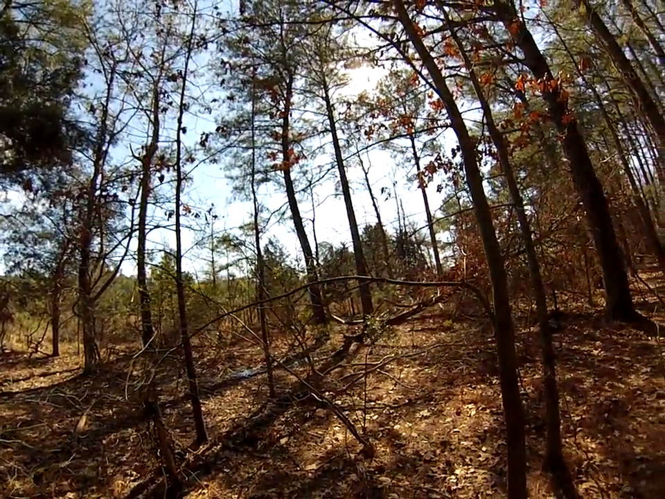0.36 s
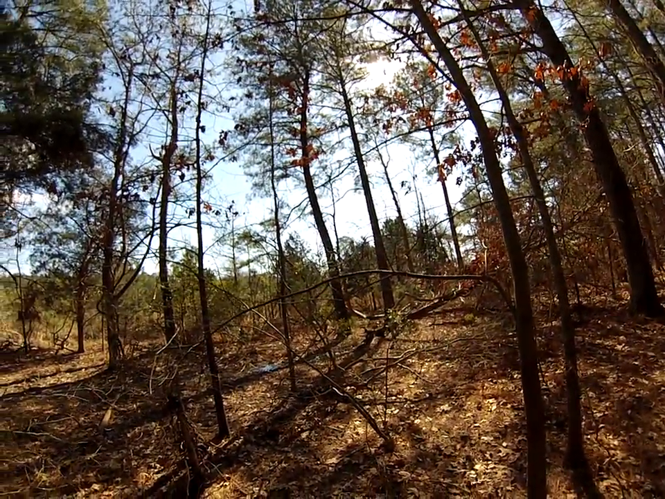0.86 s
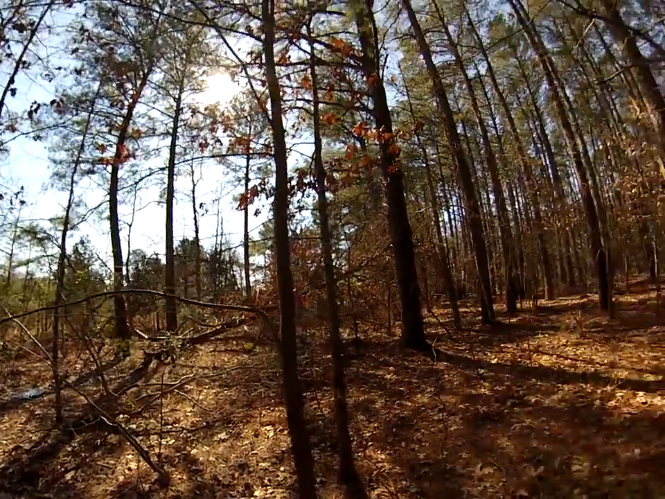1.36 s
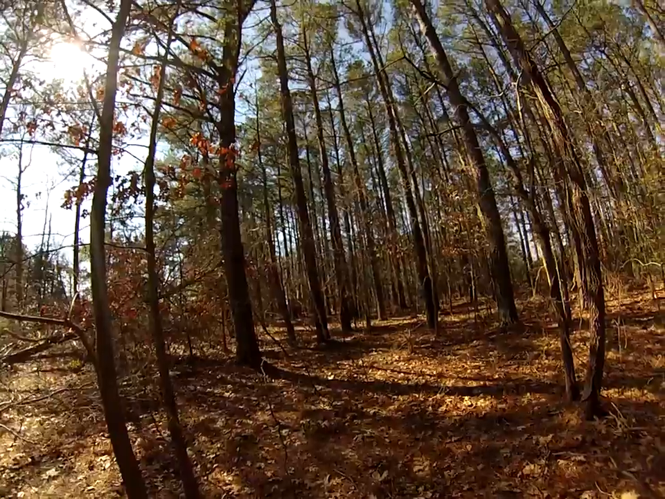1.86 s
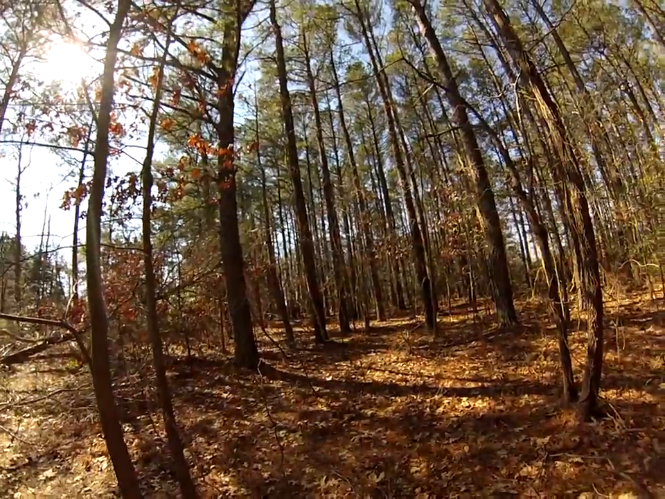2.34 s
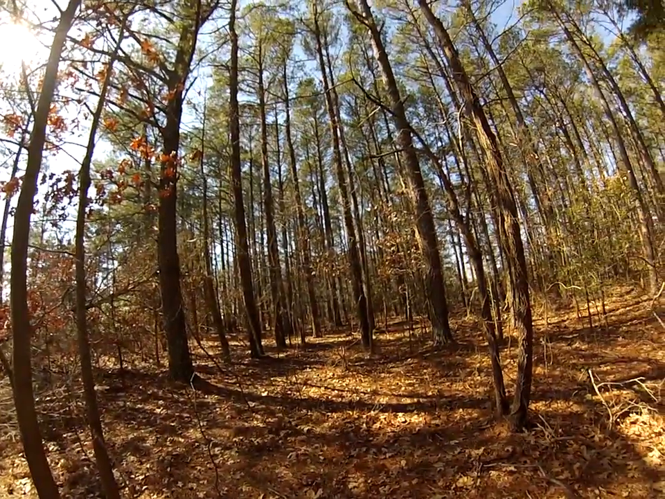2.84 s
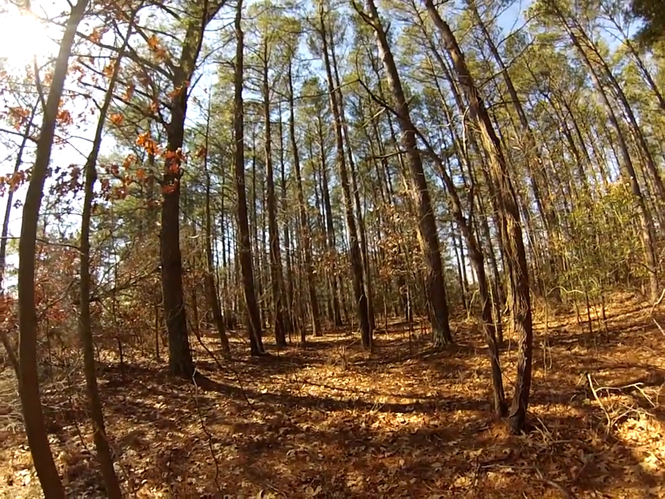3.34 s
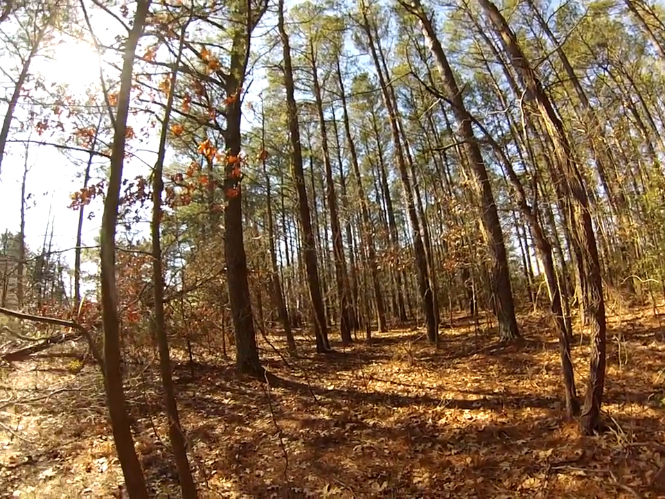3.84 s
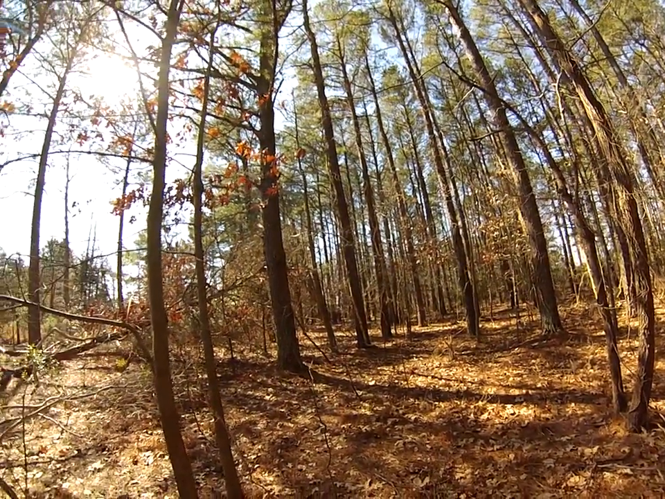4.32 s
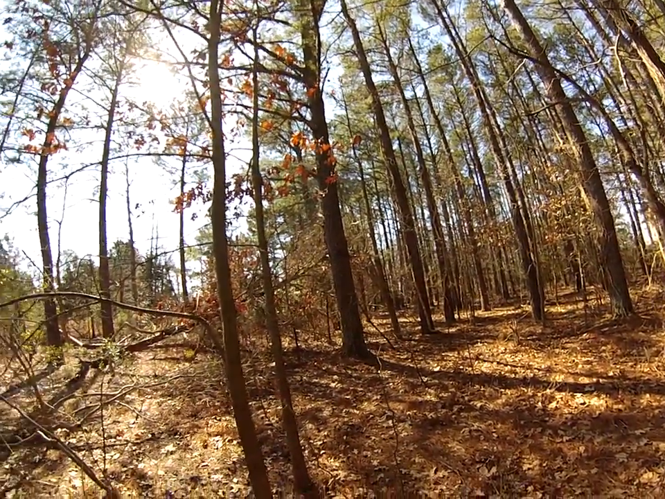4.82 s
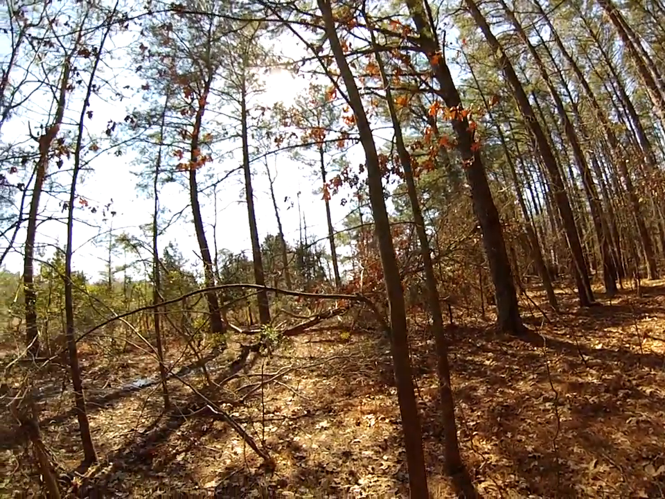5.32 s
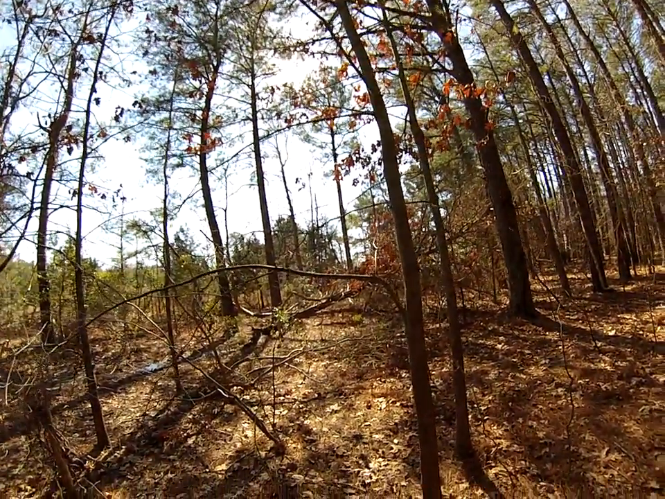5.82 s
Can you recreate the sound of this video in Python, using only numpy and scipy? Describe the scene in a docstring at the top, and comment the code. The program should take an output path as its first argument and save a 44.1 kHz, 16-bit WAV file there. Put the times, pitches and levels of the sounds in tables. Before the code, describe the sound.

A distant pack of dogs gives tongue among pine trunks, hoarse bays and bright yelps trailing echoes, with tiny bird notes above.

```python
"""Hounds in pine woods

Hounds give tongue far off in open pine woods; the trunks scatter every cry into a long tail.
Each voice is a sum of unsteady partials with breath: one bays hoarsely on two tones at once, one yelps
bright, one mellow, one howls high. Shaped noise makes the light breeze on the microphone, the dry leaves
and the steady hiss; sine tones make a small bird's notes and the thin whine of the electronics."""
import sys
import numpy as np
from scipy import signal
from scipy.fft import rfft, irfft, next_fast_len
from scipy.io import wavfile
from scipy.ndimage import uniform_filter1d, map_coordinates

SR = 44100
rng = np.random.default_rng(int(sys.argv[2]) if len(sys.argv) > 2 else 0)


def output_pcm(signal):
    """Save a mono or channel-first signal as 16-bit PCM at the path in sys.argv[1].

    Samples are clipped to [-1, 1] before scaling.
    """
    pcm = np.clip(np.atleast_2d(signal).T, -1, 1) * 32767
    wavfile.write(sys.argv[1], SR, np.round(pcm).astype(np.int16))


def boost_factor(decibels):
    """Convert a level in decibels to a linear amplitude factor."""
    exponent = np.asarray(decibels, float) / 20
    return 10 ** exponent


N = 261954
T = np.arange(N) / SR  # seconds

# Hoarse bays. Each row: start in seconds, length to the last push in seconds, level in dB, last push in dB,
# rise of the opening overtones in dB, second tone in dB.
BAY_CALLS = [(.26, .16, -40.5, 3, 3.5, -32), (.89, 0.14, -36, 3, -7, -32),
             (1.487, 0.16, -41.5, 8.5, 7, -33.5), (2.56, .16, -37, 3, -4, -31),
             (3.251, .16, -41.5, 8, 2, -34), (4.693, 0.15, -42.5, 4, 6.5, -32.5)]
# Course of every bay. Each row: share of the length (0-1), added time in seconds, pitch ratio, level in dB,
# overtones in dB, second tone's pitch ratio, second tone's level in dB.
BAY_COURSE = [(0, 0, .74, -22, 0, .99, -48), (0, .013, .85, -7, 0, .99, -39),
              (0, .036, .97, -1, -6, .97, -9), (.5, 0, .99, 0, -16, .995, -1),
              (.75, 0, 1.005, 0, -16, 1.01, 0), (1, 0, 1.05, 0, -14, 1, -9),
              (1, .017, .87, -11, -22, .99, -35), (1, .032, .64, -20, -22, .99, -44),
              (1, .051, .4, -31, -22, .99, -48)]
# Bright yelps. Each row: start in seconds, length in seconds, top pitch in Hz, depth of the pitch arch as a
# factor, sag over the call in Hz, level in dB, overtones in dB, open mouth on partials 3 and up in dB.
YELP_CALLS = [(-.12, 0.26, 512.7, 0, 3, -59.5, -6, -15), (0.179, 0.19, 561.5, 0.13, 37.4, -33.5, -10, 4),
              (1.08, .19, 515.5, .6, 2.7, -44, 0.5, -5.5),
              (2.065, 0.23, 519.8, 1.01, 4.2, -36.5, -6.5, 0.5),
              (2.55, .22, 509.3, 1.13, 2.9, -36, -10.5, 4.5),
              (5.575, 0.25, 546.7, 1.01, 3.6, -33.5, -7, 1.5)]
# Course of every yelp. Each row: share of the length (0-1), added time in seconds, pitch below the top as a
# fraction, level in dB, overtones in dB.
YELP_COURSE = [(0, 0, .2, -19, 4), (0, .012, .17, -11, 3), (0, .036, .055, -4, 3), (.29, 0, 0, -1, -1),
               (.58, 0, .008, 0, 0), (.78, 0, .06, -4, 4), (1, -.02, .14, -11, 4), (1, 0, .17, -32, 6)]
# Mellow yelps. Each row: start in seconds, length to the steep drop in seconds, top pitch in Hz, level in dB,
# overtones in dB.
MELLOW_CALLS = [(4.691, .188, 520.8, -29, -22.5), (5.135, .145, 507.2, -29.5, -27)]
# Course of every mellow yelp. Each row: share of the length (0-1), added time in seconds, pitch ratio,
# level in dB, overtones in dB.
MELLOW_COURSE = [(0, 0, .68, -32, 21), (0, .014, .77, -21, 20), (.22, 0, .85, -15, 13),
                 (.45, 0, .95, -5, 5), (.77, 0, 1, 0, 0), (1, 0, .94, -7, 0), (1, .02, .65, -24, -3),
                 (1, .045, .37, -38, -3)]
# High howls. Each row: start in seconds, length in seconds, pitch in Hz, sag in Hz/s, level in dB, fade in dB/s.
HOWL_CALLS = [(.15, 0.071, 706, 100, -35.5, 61), (0.215, 0.051, 713, 60, -41, 32),
              (.31, 0.147, 672, 370, -34, -20), (0.462, 0.425, 653, 60, -32.5, 25.5),
              (1.229, 0.067, 610, 200, -40.5, 142), (5.568, .045, 655, 3, -47, 30)]

# Combination tones from the larynx. Each row: multiple of the first tone, multiple of the second.
COMBINATIONS = [(2, -1), (-1, 2), (3, -1), (1, 1), (0, 2), (4, -1), (2, 1), (1, 2)]
# Their levels, in the same order: dB relative to the second tone.
COMBINATION_DB = [-26, -15, -16, -13, -19, -25, -33, -38]
# Resonance of throat and mouth. Each row: frequency in Hz, gain in dB over the overtone level.
BAY_RESONANCE = [(600, 0), (900, 0), (1250, -9), (1500, -21), (1750, -38), (2600, -46)]
YELP_RESONANCE = [(800, -1), (1050, 1), (1300, -5), (1600, -11), (1800, -28), (2150, -20), (2400, -29),
                  (2750, -33)]
MELLOW_RESONANCE = [(700, 0), (1000, 0), (1350, -5), (1650, -30), (2050, -26), (2600, -30)]
HOWL_RESONANCE = [(1200, -2), (1400, -4), (1900, -17), (2600, -32), (3300, -40)]
# Colour of the hoarse breath. Each row: frequency in Hz, relative density in dB per Hz.
BREATH_COLOUR = [(220, -36), (330, -12), (600, 0), (950, -5), (1300, -16), (1600, -30), (2000, -42),
                 (4000, -70)]
# Decay of the woods. Each row: frequency in Hz, time to fall 60 dB in seconds.
WOODS_DECAY = [(300, .9), (600, 1.25), (1100, 1.0), (1600, .65), (2100, .5), (6000, .3)]
# Strength of the echoes; thin trunks return little bass. Each row: frequency in Hz, echo in dB.
TRUNK_ECHO = [(200, -26), (330, -14), (450, -7), (1500, -5), (2200, -1), (4000, -4)]

# Buffets of the breeze. Each row: time in seconds, level in dB.
BUFFETS = [(0.0, -44), (0.05, -52.5), (0.84, -46), (0.88, -53.5), (1.47, -46.5), (1.72, -56), (1.8, -48),
           (2.55, -51.5), (2.74, -35.5), (3.09, -50.5), (5.87, -50), (5.94, -46)]
# Colour of the breeze. Each row: frequency in Hz, relative density in dB per Hz.
BREEZE_COLOUR = [(11, -33), (18, 3), (32, 2), (75, -6), (156, -31.5), (178, -36), (250, -25.5), (320, -59),
                 (550, -120)]
# Stirs in the leaves. Each row: peak in seconds, rise in seconds, fall in seconds, level in dB.
LEAF_STIRS = [(.23, 0.023, 0.062, -68), (1.01, 0.047, 0.03, -77), (1.19, 0.16, .06, -70.5),
              (2.131, 0.02, 0.087, -80.5), (2.68, .05, 0.099, -79), (5.05, 0.16, .06, -81),
              (5.295, 0.0049, 0.035, -68.5), (5.86, 0.067, 0.43, -59)]
# Colour of the leaves. Each row: frequency in Hz, relative density in dB per Hz.
LEAF_COLOUR = [(1470, -12.5), (2500, -1), (2880, -3), (5970, -7.5), (12000, -22.5), (12700, -12),
               (15000, -24.5)]
# Clear bird notes. Each row: start in seconds, length in seconds.
CLEAR_NOTES = [(0, .03), (.295, .055), (.645, .04), (2.15, .04), (2.295, .05), (2.48, .045), (2.83, .05),
               (3.035, .04), (3.3, .055), (3.65, .045), (3.85, .045), (4.13, .055)]
# Hoarse bird notes: starts in seconds.
HOARSE_NOTES = [.9, 1.14, 1.36, 1.61, 1.96, 4.97]
# Colour of far woods and microphone hiss. Each row: frequency in Hz, relative density in dB per Hz.
AIR_COLOUR = [(60, -16), (100, 3), (230, -7.5), (500, -5), (870, -10), (1660, -20.5), (4270, -25),
              (8000, -28.5), (12000, -28), (13500, -30), (15200, -33)]
# Tones of the whine. Each row: frequency in Hz, level in dB rms within a burst.
WHINE_TONES = [(4160, -87), (5280, -94), (7780, -94), (8316, -75), (8882, -84), (10560, -94), (11910, -87),
               (12472, -75), (13034, -81), (13588, -91)]


def hounds():
    """Superposition: each hound stands elsewhere, so each voice has its own set of echoes."""
    bay = voice(list(bays()), BAY_RESONANCE, jitter=0.018, shimmer_db=2.5, breath_db=-38.0)
    mouths = [row[-1] for row in YELP_CALLS]
    yelp = voice(list(yelps()), YELP_RESONANCE, jitter=0.012, shimmer_db=2.62, breath_db=-28.5, mouths=mouths)
    mellow = voice(list(mellows()), MELLOW_RESONANCE, jitter=0.0136, shimmer_db=3.1, breath_db=-23.5)
    howl = voice(list(howls()), HOWL_RESONANCE, jitter=0.014, shimmer_db=2.2, breath_db=-20, side=(102, -15))
    throb_hz, throb_db = 26, 4
    howl = howl * boost_factor(throb_db * np.sin(2 * np.pi * throb_hz * T + 3 * wobble(9)))
    return sum(cry + woods(cry, rise=0.057) for cry in (bay, yelp, mellow, howl))


def bays():
    """Biphonation: a scoop up, a hold with a second tone, a last push, then the pitch collapses."""
    first_hz, second_hz = 429.1, 526.5
    for start, length, db, push_db, open_db, second_db in BAY_CALLS:
        s, share, ratio, level, over, ratio2, level2 = stretch(BAY_COURSE, start, length)
        level = db + level + push_db * (share == 1)
        over = over + open_db * (share == 0)
        yield np.c_[s, first_hz * ratio, level, over, second_hz * ratio2, second_db + level2]


def yelps():
    """Coupling of pitch and loudness: both arch together."""
    tire_db_per_hz = 0.22  # a sagging yelp also weakens
    for start, length, top_hz, arch, sag_hz, db, over_db, _ in YELP_CALLS:
        s, share, under, level, over = stretch(YELP_COURSE, start, length)
        hz = top_hz * (1 - arch * under) - sag_hz * share
        level = db + level - tire_db_per_hz * sag_hz * share
        yield np.c_[s, hz, level, over_db + over]


def mellows():
    """Falling overtone content: a slow climb darkens as it swells, then drops steeply."""
    for start, length, top_hz, db, over_db in MELLOW_CALLS:
        s, _, ratio, level, over = stretch(MELLOW_COURSE, start, length)
        yield np.c_[s, top_hz * ratio, db + level, over_db + over]


def howls():
    """Breath pressure: after a quick scoop, pitch and level sag as the breath runs out."""
    rise_s, fall_s = 0.03, 0.019
    scoop, edge_db, over_db = 0.057, -15, -23  # scoop: fraction of the pitch
    for start, length, top_hz, sag, db, fade in HOWL_CALLS:
        age = np.array([0, rise_s, max(length - fall_s, rise_s), length])
        held = np.clip(age - rise_s, 0, None)
        edge = (age == 0) | (age == length)
        hz = (top_hz - sag * held) * (1 - scoop * (age == 0))
        level = db - fade * held + edge_db * edge
        yield np.c_[start + age, hz, level, over_db + 0 * age]


def stretch(course, start, length):
    """Time scaling: the moments of a course fitted to one call, its shares, then its other columns."""
    share, plus, *cols = np.transpose(course)
    return start + share * length + plus, share, *cols


def voice(calls, throat, jitter, shimmer_db, breath_db, mouths=None, side=None):
    """Harmonic series on an unsteady pitch, with breath; a second tone, if any, adds combination tones."""
    out, breath = np.zeros(N), noise(BREATH_COLOUR)
    for rows, mouth_db in zip(calls, mouths or np.zeros(len(calls))):
        s, *cols = np.transpose(rows)
        on = (T >= s[0]) & (T < s[-1])
        n = on.sum()
        curves = [uniform_filter1d(np.interp(T[on], s, c), size=400) for c in cols]
        hz, db, over_db, *second = curves

        def turn(pitch):
            """Phase as the running integral of a jittered frequency."""
            return 2 * np.pi * np.cumsum(pitch * (1 + jitter * wobble(160, size=n))) / SR

        def shake():
            """Shimmer: a random level change in dB."""
            return shimmer_db * wobble(70, size=n)

        phase = turn(hz)
        cry = boost_factor(db + shake()) * np.sin(phase)
        cry += boost_factor(db + breath_db) * breath[on]
        for k in range(2, 6):  # higher partials flicker more
            partial_db = db + over_db + along(throat, k * hz) + mouth_db * (k > 2) + k / 2 * shake()
            cry += boost_factor(partial_db) * np.sin(k * phase + k)
        if second:
            second_hz, second_db = second
            other = turn(second_hz)
            cry += boost_factor(second_db + shake()) * np.sin(other)
            cry += boost_factor(second_db - 17) * breath[on]
            for (a, b), mix_db in zip(COMBINATIONS, COMBINATION_DB):
                cry += boost_factor(second_db + mix_db + 2 * shake()) * np.sin(a * phase + b * other)
        if side:  # a flutter of the folds puts a side tone above the pitch
            side_hz, side_db = side
            cry += boost_factor(db + side_db + 2 * shake()) * np.sin(phase + 2 * np.pi * side_hz * T[on])
        out[on] += np.sqrt(2) * cry * signal.windows.tukey(n, 0.04)
    return out


def woods(x, rise):
    """Multiple scattering: trunks near and far answer, so the tail swells, then decays band by band."""
    hz, t, z = signal.stft(rng.standard_normal(2 * SR), SR, nperseg=256)
    swell_s = rise * 500 / (hz[:, None] + 200)  # twigs nearby scatter the treble at once
    shape = 1 - np.exp(-t / swell_s)
    shape *= boost_factor(-60 * t / along(WOODS_DECAY, hz)[:, None])
    shape *= boost_factor(along(TRUNK_ECHO, hz))[:, None] / np.linalg.norm(shape, axis=1, keepdims=True)
    tail = signal.istft(z * shape, SR, nperseg=256)[1]
    return signal.fftconvolve(x, tail / np.sqrt(128))[:N]  # 128 samples a frame


def breeze():
    """Wind pressure: lumpy low-frequency swings at the microphone, rising and falling in buffets."""
    lumps = unit(boost_factor(0.84 * wobble(10)) * noise(BREEZE_COLOUR))
    return boost_factor(np.interp(T, *np.transpose(BUFFETS))) * lumps


def leaves():
    """Granular noise: dry leaves crackle in clumps, faintly all along and louder at each stir."""
    grains = boost_factor(1.5 * wobble(30) + 2.5 * wobble(400))
    level = boost_factor(-77)  # the faint, constant crackle
    for peak, rise, fall, db in LEAF_STIRS:
        level = level + boost_factor(db) * np.exp(-np.abs(T - peak) / np.where(T < peak, rise, fall))
    return level * unit(grains * noise(LEAF_COLOUR))


def bird():
    """Frequency modulation: clear notes have a strong octave; hoarse ones smear in pitch and weaken it."""
    out = np.zeros(N)
    # start s, length s, pitch Hz, level dB, pitch smear Hz
    notes = [(s, length, 5640, -71.5, 8) for s, length in CLEAR_NOTES]
    notes += [(s, 0.14, 5740, -72.5, 200) for s in HOARSE_NOTES]
    for s, length, hz, db, smear_hz in notes:
        on = (T >= s) & (T < s + length)
        n = on.sum()
        phase = 2 * np.pi * np.cumsum(hz + smear_hz * wobble(588, size=n)) / SR
        octave = boost_factor(-3 - smear_hz / 20) * np.sin(2 * phase)
        out[on] += boost_factor(db) * (np.sin(phase) + octave) * signal.windows.tukey(n, 0.4)
    return out


def air():
    """Stationary noise: far woods and microphone hiss, drifting slightly in level."""
    return boost_factor(-58.0 + 0.19 * wobble(2.72)) * noise(AIR_COLOUR)


def whine():
    """Periodic gating: the electronics leak thin tones in 48 bursts a second, with short gaps between."""
    since = (T + 0.0011) % (1 / 48)  # seconds into the burst; each restarts the tones
    tones = np.zeros(N)
    for hz, db in WHINE_TONES:
        tones += np.sqrt(2) * boost_factor(db) * np.sin(2 * np.pi * (hz * since + rng.random()))
    gate = (since < 0.0181) * 1.0
    return tones * uniform_filter1d(gate, size=20)


def noise(spectrum):
    """Spectral shaping: Gaussian noise of rms 1 with the given colour."""
    m = next_fast_len(N)
    gain = boost_factor(along(spectrum, np.fft.rfftfreq(m, 1 / SR)))
    return unit(irfft(rfft(rng.standard_normal(m)) * gain, m)[:N])


def wobble(rate, size=N):
    """Band-limited fluctuation: a smooth random curve with rate knots a second."""
    knots = rng.standard_normal(int(size * rate / SR) + 4)
    return map_coordinates(knots, [np.arange(size) * rate / SR])


def along(points, hz):
    """Logarithmic frequency scale: (Hz, value) points interpolated on it."""
    f, v = np.transpose(points)
    return np.interp(np.log(hz + 1), np.log(f + 1), v)


def unit(x):
    """Power normalisation: scaled to rms 1."""
    return x / np.sqrt(np.mean(x ** 2) + 1e-20)


def scene():
    """Superposition: all the sound sources and the hiss sum at the one microphone."""
    return (hounds() + breeze() + leaves() + bird() + air())[None]


def top_cut(x):
    """Nothing passes above the cut-off."""
    return signal.sosfilt(signal.butter(12, 15190, fs=SR, output="sos"), x)


def record(dry):
    """Electrical interference: the whine of the electronics adds to the microphone signal."""
    mix = dry + whine()
    return top_cut(mix)


dry = scene()
out = record(dry)
output_pcm(out)
```